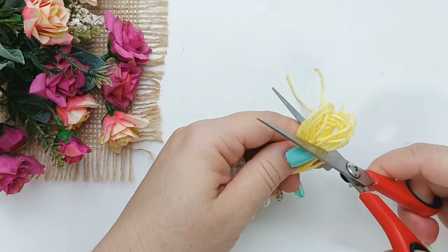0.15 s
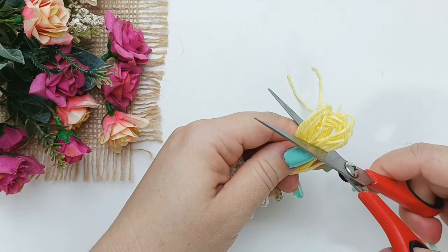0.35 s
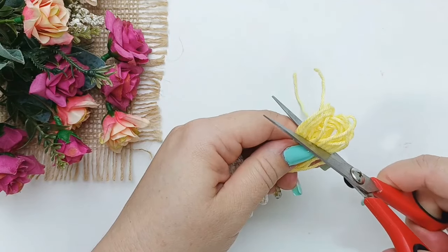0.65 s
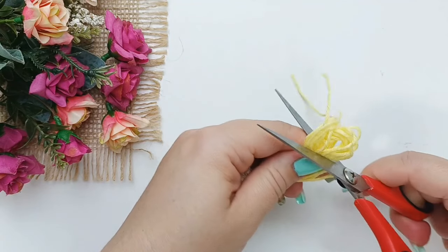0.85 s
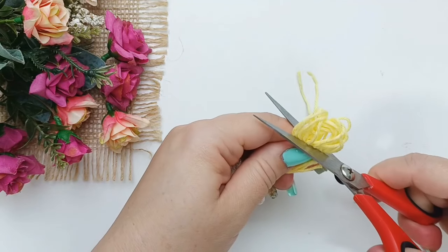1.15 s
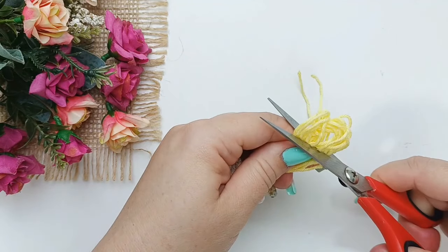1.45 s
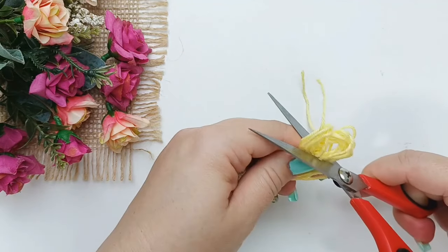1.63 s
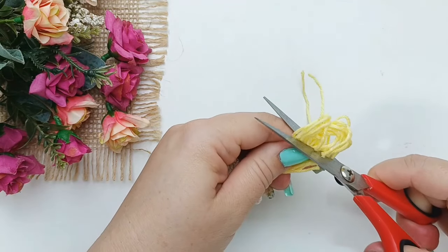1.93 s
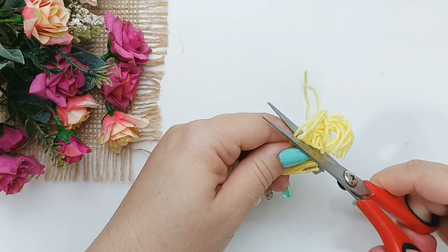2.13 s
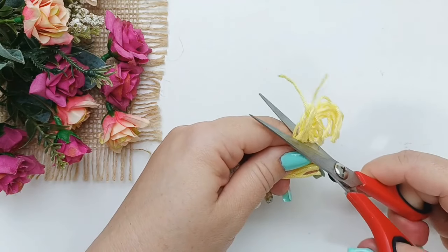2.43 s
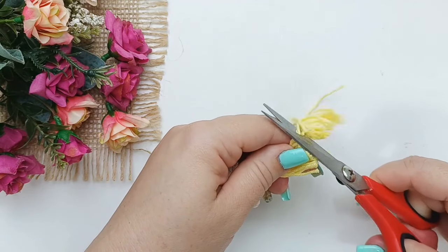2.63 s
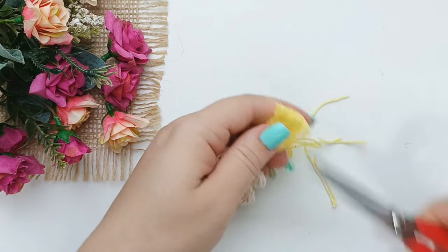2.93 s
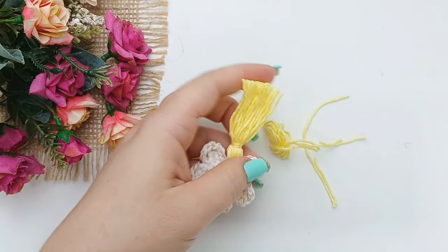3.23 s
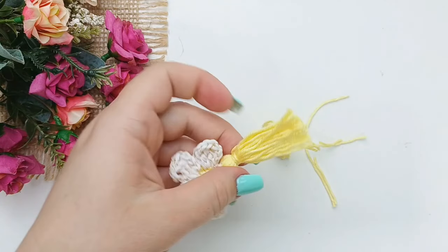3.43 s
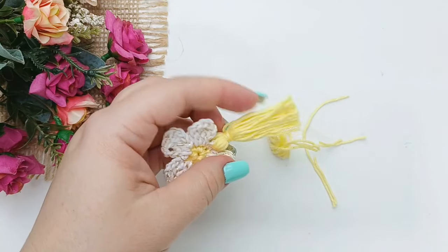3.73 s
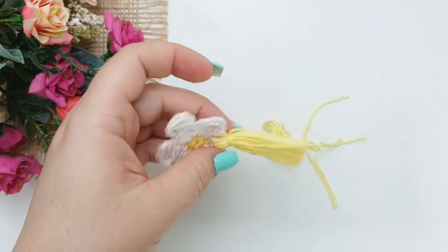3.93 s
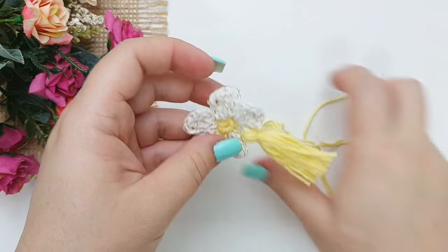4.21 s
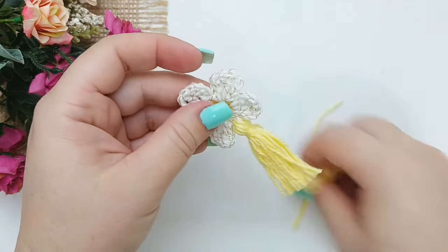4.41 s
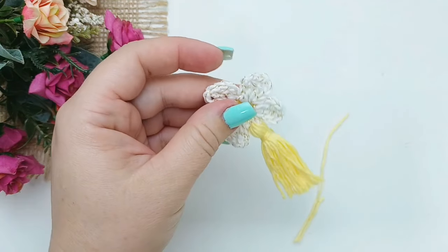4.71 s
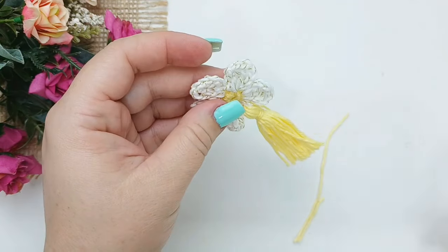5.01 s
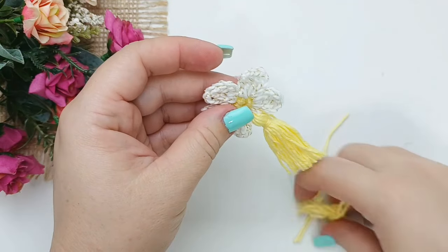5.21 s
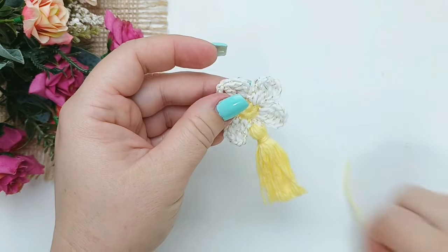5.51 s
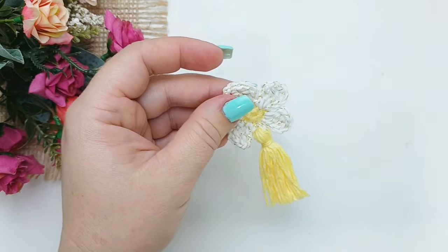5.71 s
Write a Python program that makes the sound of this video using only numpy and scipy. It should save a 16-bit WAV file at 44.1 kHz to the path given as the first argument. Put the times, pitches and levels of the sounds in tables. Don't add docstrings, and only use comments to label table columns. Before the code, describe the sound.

A quiet indoor room with hard walls, picked up close by a phone in stereo, with soft air hiss, a faint low fan hum that swells and drops, and very faint chirring outside about three times a second until 5 s. Small steel scissors cut yarn: thin crackling snips at 0.4-0.6 s, a denser crunch at 1.0-1.25 s, grinding fibre from 1.7 s leading to the sharpest bright snips at 1.9-2.0 s, then two crisp cuts with handle knocks near 2.6 s. Tiny ticks and a dull rustle follow to 3.5 s. The scissors land on a wooden table at 3.62 s, bounce, and rattle down in a loud woody clatter at 3.8-3.85 s. Light taps lead to a firm palm slap and short skid at 4.3 s. Near quiet follows, with minute nail ticks. Fingers land at 5.23 s, soft rubbing comes at 5.4-5.8 s, and a low wrist thump at 5.8 s.

```python
import sys
import numpy as np
from scipy import signal
from scipy.fft import rfft, irfft
from scipy.io import wavfile
from scipy.ndimage import uniform_filter1d

SR = 44100
rng = np.random.default_rng(int(sys.argv[2]) if len(sys.argv) > 2 else 0)


def to_wav(s):
    ch = np.atleast_2d(s).T
    pcm = np.round(np.clip(ch, -1, 1) * 32767)
    wavfile.write(sys.argv[1], SR, pcm.astype(np.int16))


def convert_level_to_amplitude(level_db):
    exponent = np.asarray(level_db, float) / 20
    return 10 ** exponent


N = 258108
TIME = np.arange(N) / SR

# time in seconds, peak in dB, burst length in ms.
SNIPS = [(0.3677, -64, 3.5), (0.386, -63, 4.1), (0.417, -56.5, 2.9), (0.4523, -48.5, 2.1),
         (0.476, -56, 3.9), (0.5247, -59, 2.9), (0.5407, -57, 6.1), (0.558, -44.5, 2.4), (0.585, -54, 2.3),
         (0.9774, -65.5, 3.6), (1.016, -62, 2.1), (1.1444, -45, 7.2), (1.16, -49, 2.2), (1.21, -51, 4),
         (1.225, -45, 5), (1.2387, -46.5, 2.3), (1.9006, -50.5, 10.3), (1.9204, -57, 2.6),
         (1.9325, -46.5, 8.1), (1.9456, -37.5, 2.5), (1.9697, -42, 3.5), (2.334, -65.5, 3.7),
         (2.4697, -54, 0.91), (2.573, -44.5, 5.2), (2.5876, -41, 2.6), (1.6874, -57, 2.5),
         (2.937, -62.5, 1.1), (2.9872, -61, 2), (3.378, -52.5, 1.1), (3.5015, -47.5, 0.87)]
# start in seconds, length in seconds, peak in dB.
RUNS = [
    (1.062, 0.051, -49.5),
    (1.695, .14, -55),
]
RUN_GAP_S, RUN_MS = 0.0135, 4.7
RUN_LEAD_DB, RUN_SCATTER_DB = -8, 1.5
# start in seconds, hold in seconds, level in dB,
# pivot ring relative to it in dB.
GRIND = [(0.5, 0.088, -69.5, -2), (0.78, 0.046, -78, -17), (0.95, 0.1, -80.5, -21),
         (1.08, 0.14, -69.5, -4.5), (1.54, 0.026, -76, -9), (1.74, 0.19, -70.5, -0.5),
         (2.46, .08, -83, -26), (2.574, 0.0056, -60, -7.5)]
GRIND_RISE_DB_S, GRIND_FALL_DB_S = 203, 218.5
# pitch in Hz, width in Hz, level in dB.
BLADES = [(8200, 87, -7), (9400, 95, 8), (10200, 49, 11), (10100, 55, -2.5), (10920, 110, -2.5),
          (12180, 140, 12.5), (12700, 91, -2), (13500, 130, -26.5), (14100, 120, -30), (16100, 52, -27)]
# pitch in Hz, width in Hz, level in dB.
PIVOT = [(2070, 460, -4), (2830, 420, -2.5), (3357, 450, -1.5)]
LOW_RING_DB, LOW_RING_DB_PER_DOUBLING = -14.5, 4
# frequency in Hz, level in dB per Hz.
FIBRE = [(6400, -29.5), (7600, -14), (8600, -4.5), (11000, -8), (15200, -7.5), (16000, -33)]

# time in seconds, board level in dB, low thud relative to it in dB,
# hardness in dB, which lifts knock, clack and tick together.
CLOSE = [
    (1.943, -55.5, -21, 1),
    (2.577, -52.5, -22, -10),
    (2.592, -48.5, -14, -0.5),
]
DROP = [
    (3.623, -33, 0.5, 2.5),
    (3.668, -34.5, -1, -2),
    (3.705, -44.5, -6, -4),
]
THUMP = [
    (3.797, -72, 2, 41.5),
    (3.804, -20.5, -11, 9),
    (3.812, -27, -18, 6),
    (3.826, -23.5, -8, -7),
    (3.833, -31, -7.5, 4),
    (3.841, -34, 1.5, -14),
    (3.849, -28, -16, 9.5),
]
TAPS = [(3.738, -57, -21, 9.5), (4.167, -76, -39.5, 8), (4.223, -60.5, 4.5, -1), (4.251, -48, -18, -2.5),
        (4.627, -72.5, 9, 5), (5.444, -57, -32, -4)]
SLAP = [
    (4.312, -25, -8.5, 1.5),
    (4.322, -40.5, -1, -13),
]
NAILS = [(4.62, -86.5, -16, 1.5), (4.64, -92, -20, -2), (4.85, -95, -28, -2), (4.865, -89, -23, 0),
         (4.89, -90, -10, 0)]
SLAPS = [
    (5.224, -38.5, -6, 6),
    (5.231, -41, -23, -1),
    (5.272, -43.5, -11, -5),
]
WRIST = [
    (5.808, -47.5, 9, 11),
    (5.824, -49, 15.5, 2),
    (5.839, -51.5, 21, 4),
]
BOARD = {"handles": [(370, 160, -8), (640, 120, 4)], "drop": [(220, 164, 5), (316, 15, 11),
         (670, 92, 10.5)], "thump": [(281, 67, -20), (338, 23, -25), (432, 63, -10.5), (644, 48, 4.5),
         (668, 97, -5), (796, 17, 9.5)], "palm": [(258, 76, 13.5), (560, 350, 5.5), (870, 210, -5)],
         "hand": [(245, 25, 6.5), (414.4, 6.8, 2), (637, 21, -11), (1050, 360, -8)]}
EDGE = {"handles": (-6, 4.2, -18), "drop": (-6.5, -6, 0), "thump": (-11.5, -16, -29.5),
        "wrist": (-8.5, -9, -8), "palm": (-11.5, -13, -5), "nail": (0, 6.1, 29.8), "slap": (-14.5, -6, -9),
        "tap": (1, 5.5, -28)}
# pitch in Hz, width in Hz, level in dB.
THUD = [(65, 64, 1.5), (101, 23, 13), (153.4, 28, 1)]
# pitch in Hz, width in Hz, level in dB.
KNOCK = [(1364, 590, 0), (2090, 540, -0.5)]
# pitch in Hz, width in Hz, level in dB.
CLACK = [(2400, 940, 14), (3900, 3600, 3)]
# pitch in Hz, width in Hz, level in dB.
TICK = [(5800, 1200, -15), (11000, 18000, -2)]
# pitch in Hz, width in Hz, level in dB.
STEEL = [(5900, 770, 4.5), (8700, 1300, -1), (8100, 39, 20), (12600, 4100, 6)]
# pitch in Hz, width in Hz, level in dB.
RATTLE = [(7900, 2000, 22), (12500, 6500, -9)]
# pitch in Hz, width in Hz, level in dB.
NAIL = [(5700, 650, 13), (9900, 6100, -13.5)]

# start in seconds, hold in seconds, level in dB,
# treble relative to it in dB.
SLIDES = [(3.37, 0.029, -80, 4), (4.4, 0.06, -84, -15), (4, 0.11, -81.5, 8), (5.52, 0.08, -84, 5.5),
          (5.68, 0.054, -67.5, -3), (0.816, 0.03, -93.5, 17.5), (2.22, 0.042, -97, 14)]
# start in seconds, hold in seconds, level in dB,
# treble relative to it in dB.
SKIDS = [(4.225, 0.18, -64, -5.5), (4.316, 0.052, -43, -13), (5.228, 0.027, -48, -15.5),
         (5.44, 0.0073, -63.5, -13), (5.803, .05, -61.5, -2)]
SLIDE_DB_S, SKID_RISE_DB_S, SKID_FALL_DB_S = 195, 4000, 226.5
# start in seconds, hold in seconds, level in dB.
BRUSH = [
    (5.73, .12, -67.5),
]
# start in seconds, hold in seconds, level in dB.
DRAG = [
    (3.33, 0.14, -85),
    (5.5, 0.045, -77),
    (5.69, 0.052, -76),
]
# start in seconds, hold in seconds, level in dB.
LEAN = [
    (1.95, 0.2, -79),
    (3.3, 0.44, -73),
    (5.42, 0.07, -69.5),
]
LEAN_DB_S = 80
# frequency in Hz, level in dB per Hz.
SKIN = [(290, -38), (500, -14), (831, -11), (1260, -17), (2220, -1), (2430, -6), (2680, -1), (7000, -21),
        (9100, -62), (15400, -120)]

# start in seconds, hold in seconds, level in dB.
SWAY = [
    (2.86, 0.04, -81.5),
    (3.82, 0.013, -44.5),
    (4.36, 0.025, -55),
    (5.3, 0.079, -62.5),
]
SWAY_RISE_DB_S, SWAY_FALL_DB_S = 400, 116
RUMBLE_DB = -75.5
# start in seconds, hold in seconds, level in dB.
HUM = [(.45, 0.73, -66.5), (1.5, 0.13, -72.5), (2.0, 0.55, -73.5), (2.98, .72, -68), (4.5, 0.46, -72),
       (5.6, .3, -69.5)]
HUM_HZ, HUM_RISE_DB_S, HUM_FALL_DB_S = 206.2, 25.5, 163
# frequency in Hz, level in dB per Hz.
AIR = [(15, -63.5), (25, -42), (42, -28), (76, -17), (123, 0.5), (175, -42), (206, -12.5), (236, -6),
       (734, -33), (936, -27), (1160, -30), (2840, -34), (3520, -35), (13200, -32.5), (16000, -33.5)]
AIR_DB = -78
CHIRR_FIRST_S, CHIRR_EVERY_S, CHIRR_LAST_S, CHIRR_DB = 0.275, 0.3535, 5.0, -83.5
# centre in Hz, seconds to fall by 60 dB, level in dB.
ROOM = [(60, 0.33, -1), (130, 0.74, -23), (243, 0.6, -7.5), (560, 0.093, -12), (946, 0.49, 2),
        (1910, 0.4, -3), (3760, 0.33, -1.5), (8100, 0.053, -6.5), (12960, 0.31, -6.5)]

# from Hz, to Hz, limit relative to the treble in dB.
STARVED = [(3700, 4400, -17.5), (4400, 5300, -16.5), (5300, 6300, -16)]
STARVED_TOP_DB, TOP_HZ = -81, 15850


def scissors():
    rough = convert_level_to_amplitude(3.9 * walk(140))
    high = strokes(GRIND, GRIND_RISE_DB_S, GRIND_FALL_DB_S) * rough
    low = strokes(GRIND, GRIND_RISE_DB_S, GRIND_FALL_DB_S, column=3) * rough
    for s, db, ms in SNIPS + runs():
        near = slice(int(s * SR) - SR // 50, int(s * SR) + SR // 20)
        length = max(ms, 0.5)
        t = (TIME[near] - s) * 1000 / length - 0.8
        burst = convert_level_to_amplitude(db + 2.5) * np.exp(-np.abs(t) * np.where(t < 0, 2.2, 1.1))
        high[near] += burst
        low[near] += convert_level_to_amplitude(LOW_RING_DB + LOW_RING_DB_PER_DOUBLING * np.log2(length / 3)) * burst
    snaps = grit(1.6, channels=3)
    snaps = unit(0.11 * ports(snaps[0], lag=5.9) + snaps[1:])
    steel = ring(snaps * high, BLADES)
    fibre = unit(colour(snaps, FIBRE)) * high
    pivot = convert_level_to_amplitude(14) * ring(ring(snaps * low, PIVOT), PIVOT)
    hard = high * np.minimum(high / convert_level_to_amplitude(-47), 1)
    crunch = convert_level_to_amplitude(-17.5) * unit(band(snaps, 3600, 7000)) * hard
    return band(steel, 5500, 12000) + convert_level_to_amplitude(-5) * fibre + pivot + crunch


def runs():
    snips = []
    for s, length, db in RUNS:
        for k, (a, b, c) in enumerate(rng.standard_normal((20, 3))):
            if k * RUN_GAP_S < length:
                start = s + RUN_GAP_S * (k + 0.14 * a)
                peak = db + RUN_LEAD_DB * np.exp(-k / 1.36) + RUN_SCATTER_DB * b
                snips.append((start, peak, RUN_MS * convert_level_to_amplitude(1.6 * c)))
    return snips


def table(events, modes, tick, contact_ms, edge):
    out, t = np.zeros(N + SR), TIME[:SR // 5]
    push = np.exp(-((t * 1000 - 2.2 - contact_ms) / contact_ms) ** 2)
    direct = push - uniform_filter1d(push, size=150)
    board, thud = ring(push, modes) + 0.53 * direct, ring(push, THUD)
    after = np.clip(t - 0.0018, 0, 1)
    touched = after > 0
    noises = rng.standard_normal((len(events), len(t)))
    for (s, db, thud_db, hard_db), noise in zip(events, noises):
        crack = touched * (np.exp(-after / 0.00006) + 0.16 * noise * np.exp(-after / 0.002))
        crack = crack + 1e-12 * noise
        spray = 0.5 * noise * touched * np.exp(-after / 0.0015)
        sharp = ring(ring(crack + spray, [(8950, 20000, 0)]), tick)
        parts = [board, thud, ring(crack, KNOCK), ring(crack, CLACK), sharp]
        levels = [2.5, thud_db, *np.add(edge, hard_db)]
        i = int(s * SR)
        for part, relative_db in zip(parts, levels):
            out[i:i + len(t)] += convert_level_to_amplitude(db + relative_db) * part / np.abs(part).max()
    return out[:N]


def sweep():
    slips = grit(1.8, channels=2) * convert_level_to_amplitude(2.5 * walk(60))
    skin = unit(colour(slips, SKIN)) * hand_strokes()
    treble = ring(ring(slips, [(6750, 11000, 21), (10260, 4500, -16)]), [(6000, 21000, 0)])
    treble = unit(treble) * hand_strokes(column=3)
    brush = unit(band(grit(1.2, channels=2), 7800, 16000))
    brush = brush * strokes(BRUSH, SKID_RISE_DB_S, SKID_FALL_DB_S)
    drag = unit(ring(ring(slips, [(1360, 560, 0)]), [(1410, 700, 0)]))
    drag = drag * strokes(DRAG, SLIDE_DB_S, SLIDE_DB_S)
    lean = unit(ring(slips[0], [(298, 106, 0)])) * strokes(LEAN, LEAN_DB_S, LEAN_DB_S)
    return skin + treble + brush + drag + lean


def hand_strokes(column=None):
    slides = strokes(SLIDES, SLIDE_DB_S, SLIDE_DB_S, column)
    return slides + strokes(SKIDS, SKID_RISE_DB_S, SKID_FALL_DB_S, column)


def room(x):
    t, tail = TIME[:SR], 0
    for hz, t60, db in ROOM:
        noise = ring(rng.standard_normal((2, SR)), [(hz, hz / 1.03, 0)])
        noise = unit(ring(noise, [(hz, hz / 0.88, 0)]))
        tail = tail + convert_level_to_amplitude(db - 60 * t / t60) * noise * np.sqrt(hz / SR)
    mid, side = 0.077 * tail * (1 - np.exp(-t / 0.00057))
    side = signal.lfilter(*signal.butter(3, 430, "high", fs=SR), 1.05 * side)
    return signal.fftconvolve(x[None], np.array([mid + side, mid - side]), axes=1)[:, :N]


def background():
    return air() + convert_level_to_amplitude(2.5) * rumble() + chirr() + ports(fan(), lag=4.1)


def fan():
    tone = np.sin(2 * np.pi * np.cumsum(HUM_HZ + 1.9 * walk(13)) / SR)
    return np.sqrt(2) * tone * strokes(HUM, HUM_RISE_DB_S, HUM_FALL_DB_S) * convert_level_to_amplitude(0.92 * walk(15))


def air():
    hiss = colour(rng.standard_normal((2, N)), AIR)
    high = signal.sosfilt(signal.butter(4, 300, "high", fs=SR, output="sos"), hiss)
    return hiss / np.std(high) * convert_level_to_amplitude(AIR_DB + 2 + 0.57 * walk(1.3))


def rumble():
    noise = rng.standard_normal((2, N))
    shared = 0.88 * noise + 0.61 * noise[0]
    level = convert_level_to_amplitude(RUMBLE_DB + 0.5 * walk(4.46)) + strokes(SWAY, SWAY_RISE_DB_S, SWAY_FALL_DB_S)
    return unit(ring(shared, [(73.0, 28.6, 4.2), (124.7, 21.2, 6.74), (147.6, 61, 2.34)])) * level


def chirr():
    beat = ((TIME - CHIRR_FIRST_S) / CHIRR_EVERY_S + 0.5) % 1 - 0.5
    swell = convert_level_to_amplitude(CHIRR_DB) * np.exp(-(beat * CHIRR_EVERY_S / 0.068) ** 4)
    swell = swell * (TIME < CHIRR_LAST_S) * (TIME > 0.1)
    noise = rng.standard_normal((2, N))
    return unit(ring(ring(noise, [(2890, 350, 0)]), [(2950, 450, 0)])) * swell


def strokes(rows, rise_db_s, fall_db_s, column=None):
    gain = 0
    for row in rows:
        db = row[2] + (row[column] if column else 0)
        rise = rise_db_s * np.clip(row[0] - TIME, 0, 1)
        fall = fall_db_s * np.clip(TIME - row[0] - row[1], 0, 1)
        gain = gain + convert_level_to_amplitude(db - rise - fall)
    return gain


def grit(spread_db, channels=1):
    return unit(rng.standard_normal((channels, N)) * convert_level_to_amplitude(spread_db * rng.exponential(size=N)))


def walk(rate):
    k = int(SR / rate)
    steps = np.repeat(rng.standard_normal(N // k + 1), k)
    return unit(uniform_filter1d(uniform_filter1d(steps, k), k)[:N])


def ring(x, modes):
    out = 0
    for k, (hz, width, db) in enumerate(modes):
        peak = signal.iirpeak(hz, hz / width, fs=SR)
        out = out + (-1) ** k * convert_level_to_amplitude(db) * signal.lfilter(*peak, x + 1e-18)
    return out


def colour(x, points):
    hz, db = np.transpose(points)
    f = np.arange(x.shape[-1] // 2 + 1) * SR / x.shape[-1] + 1
    gain = convert_level_to_amplitude(np.interp(np.log(f), np.log(hz), db, left=-80, right=-80))
    return irfft(rfft(x) * gain, x.shape[-1])


def band(x, lo_hz, hi_hz):
    f = np.arange(N // 2 + 1) * SR / N
    return irfft(rfft(x) * ((f > lo_hz) & (f < hi_hz)), N)


def ports(x, lag):
    return np.array([np.pad(x, (int(lag), 0))[:N], x])


def unit(x):
    return x / np.sqrt(np.mean(x ** 2))


def scene():
    snips, hand = scissors(), sweep()
    handles = table(CLOSE, BOARD["handles"], TICK, 0.14, EDGE["handles"])
    blows = table(DROP, BOARD["drop"], STEEL, 0.56, EDGE["drop"])
    blows = blows + table(THUMP, BOARD["thump"], RATTLE, 0.56, EDGE["thump"])
    blows = blows + table(WRIST, BOARD["handles"], TICK, 0.41, EDGE["wrist"])
    blows = blows + table(SLAPS, BOARD["hand"], TICK, 0.42, EDGE["slap"])
    blows = blows + table(TAPS, BOARD["hand"], TICK, 0.23, EDGE["tap"])
    palm = table(SLAP, BOARD["palm"], NAIL, 0.22, EDGE["palm"])
    palm = palm + table(NAILS, BOARD["hand"], [(7700, 3500, 0)], 0.3, EDGE["nail"])
    close = convert_level_to_amplitude(-10.5) * (snips[0] + handles) + convert_level_to_amplitude(-14.5) * hand[0]
    echo = room(convert_level_to_amplitude(-3) * palm + convert_level_to_amplitude(-0.5) * blows + close)
    direct = snips + ports(handles, lag=6.1) + ports(blows + palm, lag=14) + hand
    return direct + echo + background()


def band_limit(x):
    return signal.sosfilt(signal.butter(12, 16500, fs=SR, output="sos"), x)


def record(dry):
    mix = signal.sosfilt(signal.ellip(10, 0.3, 70, TOP_HZ, fs=SR, output="sos"), dry)
    treble = uniform_filter1d(np.mean(band(mix, 9500, 10800) ** 2, axis=0), size=2000)
    for lo_hz, hi_hz, under_db in STARVED:
        part = band(mix, lo_hz, hi_hz)
        needed = np.minimum(treble * convert_level_to_amplitude(2 * under_db), convert_level_to_amplitude(2 * STARVED_TOP_DB))
        share = uniform_filter1d(np.mean(part ** 2, axis=0), size=2000) / needed
        mix = mix - part / (1 + np.abs(share) ** 6)
    return band_limit(mix)


dry = scene()
out = record(dry)
to_wav(out)
```